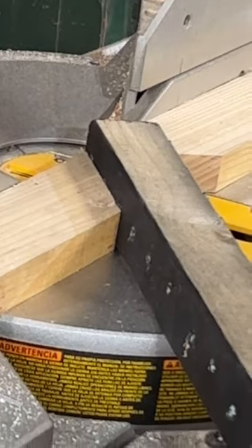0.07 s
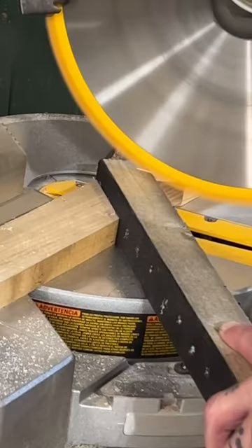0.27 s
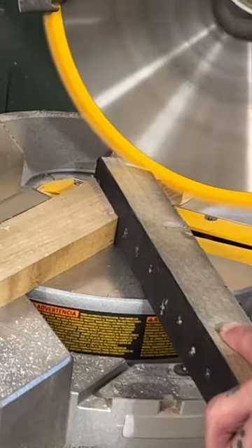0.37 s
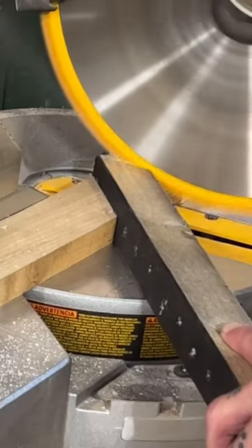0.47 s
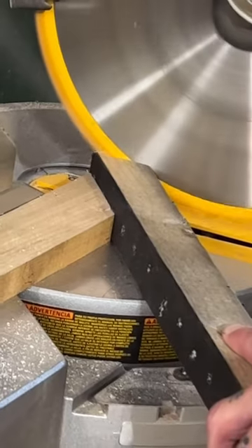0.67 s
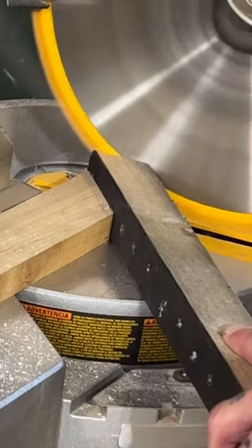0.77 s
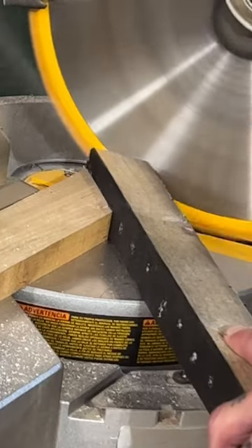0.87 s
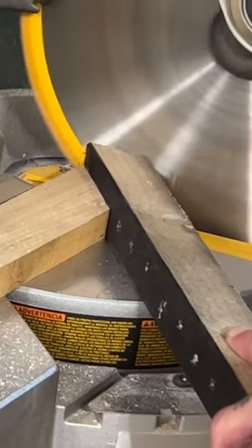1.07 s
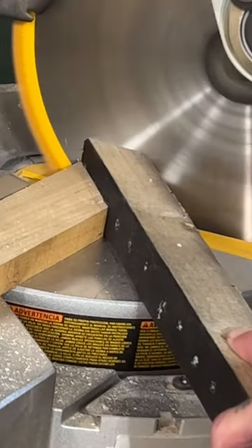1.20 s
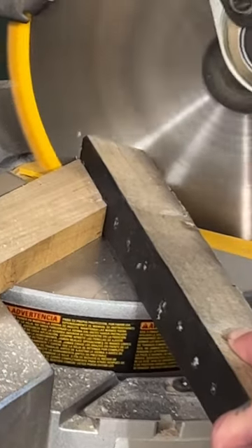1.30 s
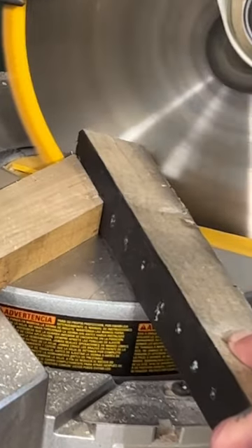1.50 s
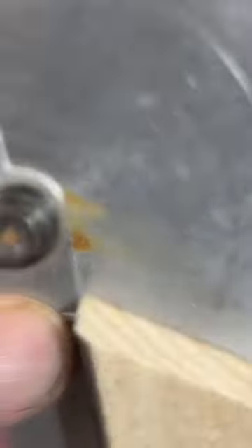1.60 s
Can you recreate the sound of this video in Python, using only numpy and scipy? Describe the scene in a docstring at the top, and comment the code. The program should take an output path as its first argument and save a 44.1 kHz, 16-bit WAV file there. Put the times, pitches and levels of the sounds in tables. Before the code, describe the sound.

Close up, a power miter saw makes one quick, whining cut through a piece of wood.

```python
"""Mitre saw, close up

One cut through wood, picked up from close by on a phone's two microphone ports. A wooden knock dies away,
then the running saw fades in. Its teeth rasp the wood, whine and ring the steel blade over motor and air.
The speed sags under load and recovers, the blade breaks free at 1.2 s, and the saw fades out."""
import sys
import numpy as np
from scipy import signal
from scipy.fft import rfft, irfft
from scipy.io import wavfile
from scipy.ndimage import uniform_filter1d

SR = 44100
rng = np.random.default_rng(int(sys.argv[2]) if len(sys.argv) > 2 else 0)


def master(y):
    """Save y as 16-bit WAV."""
    cut = np.clip(np.atleast_2d(y).T, -1, 1)
    pcm = np.round(cut * 32767)  # scale
    wavfile.write(sys.argv[1], SR, pcm.astype(np.int16))


N = 72765

# Blade speed, sagging deep in the cut. Each row: time in seconds, teeth passing per second.
TOOTH_RATE = [(.15, 2700), (.22, 2753), (.3, 2827), (.38, 2858), (.46, 2879), (.55, 2865), (.65, 2832),
              (.75, 2800), (.85, 2764), (.95, 2705), (1.02, 2682), (1.09, 2692), (1.17, 2765), (1.3, 2840),
              (1.42, 2872), (1.58, 2895)]
# How hard the teeth bite. Each row: time in seconds, gain in dB of the wood's body, the treble, the top.
BITE = [(0.16, -36, -18, -72), (0.2, 6, -10, -15), (0.25, 9.1, -10, 3), (0.3, 11.5, -2.9, -4),
        (0.36, 10.5, -3.4, 3), (0.44, 7, 0.3, -4), (0.53, 5, 1, 1), (0.6, 4, 1.9, 0.5),
        (0.66, 3.5, -1.1, 1.3), (0.74, 3.7, 2.2, -7.5), (0.81, 3, 0.3, -4.5), (0.88, 4.5, -2.7, -4),
        (0.97, -20, -2, -3), (1.06, -5, -4.5, -1), (1.15, -1, -4.5, -5), (1.198, -3, -15.5, -22),
        (1.25, -18.5, -29.5, -33)]
# Colour of tearing wood. Each row: frequency in Hz, relative level in dB.
RASP_SPECTRUM = [(25, -37), (50, -10.5), (85, -9.5), (140, -22.5), (260, -5.5), (380, -10.5), (500, -4.5),
                 (700, -8), (1000, -3.5), (1400, -7.5), (2000, -3), (2700, -1), (3500, 2.5), (4600, -2.5),
                 (5800, 3), (7200, 2), (8600, 4), (9700, -1.5), (11500, 5), (14000, -0.5), (15500, -4)]
# Tooth whine. Each row: time in seconds, level in dB at 1, 2, 3 and 5 times the tooth rate.
WHINE_LEVELS = [(.16, -35, -55, -59.5, -51), (.24, -25.5, -31, -65, -55), (.32, -30, -23, -52, -33),
                (.4, -21.5, -27.5, -47.5, -43), (.5, -32, -31, -50, -38.5), (.56, -21.5, -42.5, -42, -43.5),
                (0.611, -21, -43.5, -16, -39), (.66, -29.5, -28, -44, -38), (.75, -24.5, -26, -42.5, -38),
                (.84, -34, -58, -33, -28), (.895, -27.5, -61.5, -23, -21.5),
                (.96, -34.5, -26.5, -32.5, -40), (1.062, -26.5, -22.5, -42, -43),
                (1.095, -35, -33.5, -48, -50), (1.139, -22.5, -34, -49, -46), (1.21, -42.5, -65, -51, -60)]
# The steel disc. Each row: frequency in Hz, width in Hz, relative dB entering the wood, then deep in it.
BLADE_MODES = [(4955, 22, -52, -39), (5335, 25, -50, -39), (5690, 90, -35, -43), (6398, 22, -33, -43),
               (7112, 16, -27, -32), (7350, 16, -35, -38), (7540, 25, -39, -44), (8200, 16, -39, -36),
               (8542, 16, -35, -43), (9130, 60, -35, -37), (10050, 80, -38, -39), (11305, 25, -38, -39),
               (11940, 18, -36, -36), (12172, 18, -41, -42), (12403, 12, -35, -37), (12490, 12, -37, -38),
               (13038, 14, -46, -39), (13308, 14, -43, -41), (13701, 12, -39, -34), (14196, 18, -41, -43),
               (14293, 14, -38, -39), (14562, 16, -43, -47), (15025, 12, -46, -42)]
# Rings of the clamped wood and the fence. Each row: frequency in Hz, level in dB.
FENCE_TONES = [(801, -34.5), (2061, -53.5), (2682, -38.5)]
# Motor, gears and blade. Each row: multiple of the tooth rate, dB entering, deep in the wood, running free.
MOTOR_LINES = [(.094, -45, -57.5, -47.5), (.1878, -31, -38.5, -36.5), (.243, -35, -44.5, -49),
               (.5, -45, -36.5, -48.5), (.645, -33, -37.5, -46.5), (.717, -42.5, -43, -47.5),
               (.731, -33.5, -52, -42.5), (.938, -39.5, -64, -47), (1.305, -48, -45.5, -40),
               (1.897, -67, -28, -38), (2.608, -42.5, -42, -41.5)]
# Air roar of blade and fan. Each row: frequency in Hz, relative level in dB.
AIR_SPECTRUM = [(25, -16), (50, -15.5), (90, -18), (140, -15), (200, -17), (280, -10), (380, -8.5),
                (520, -3), (700, -6.5), (1000, -7), (1500, -7.5), (2000, -10), (2800, -5.5), (3800, -7),
                (4700, -9.5), (6000, -15), (8000, -12.5), (10000, -20), (12000, -17.5), (15500, -24.5)]
# Knocks ahead of the cut. Each row: start in seconds, level in dB, crack in dB relative to that level.
KNOCKS = [(0., -41.5, -1.5), (.051, -53, 5.5)]
# The knocked wood. Each row: frequency in Hz, relative level in dB, seconds to fall by 60 dB.
WOOD_MODES = [(152, -1.5, 0.23), (243, -4, 0.12), (514, -20, 0.1), (670, -9, 0.12), (950, -6, 0.14),
              (1706, -13, 0.17), (1900, -21, .1)]
# The crack of a knock. Each row: frequency in Hz, relative level in dB.
CRACK_SPECTRUM = [(60, 2), (150, -5.5), (400, -8.5), (900, -6.5), (1600, -17), (2800, -20.5), (5000, -29.5),
                  (9000, -37), (15000, -35)]
# Workshop room tone. Each row: frequency in Hz, relative level in dB.
ROOM_SPECTRUM = [(30, -10), (150, 2), (400, -10), (3000, -33), (15000, -45)]
# The microphone ports. Each row: frequency in Hz, lead of the left in radians, coherence from 0 to 1,
# left minus right in dB.
MIC_PORTS = [(30, 0, 0.99, 0), (100, 0.14, 0.89, -0.8), (550, 0.63, 0.78, -0.3), (1200, 0.41, 0.49, 1.4),
             (2000, 0.36, 0.66, 1.9), (2850, 0.73, 0.82, 0.3), (3700, 1.76, 0.2, 2.5),
             (4500, 0.32, 0.32, 2.7), (5300, 2.29, 0.29, 4.9), (5800, 4.87, 0.14, 4.1),
             (6500, 6.35, 0.59, 3.0), (7200, 6.33, 0.76, 2.0), (8000, 5.65, 0.69, 1.1),
             (8600, 4.99, 0.75, 2.4), (9000, 3.4, 0.9, 0), (9300, 3.14, 1, 0), (10700, 3.14, 1, 0),
             (11000, 2.85, 0.85, 0.4), (11600, 1.92, 0.59, 0.0), (12600, 0.34, 1, -0.3),
             (13700, -0.0, 1, -0.0), (14500, -0.27, 0.82, -0.1), (15100, -1.32, 0.38, -0.7),
             (15600, -2.85, 0.78, -0.2)]

TEETH = 32
ENTERING_S, DEEP_S, BREAK_FREE_S, RUNNING_FREE_S = 0.4, 1.02, 1.22, 1.29


def tearing(teeth, uneven_db=2, scatter_db=1, grain_db=0.5):
    """Each tooth tears a burst of fibres; uneven teeth repeat every turn, and the wood's grain varies."""
    tooth = teeth.astype(int)
    size_db = uneven_db * rng.standard_normal(TEETH)[tooth % TEETH]
    size_db += scatter_db * rng.standard_normal(N)[tooth]
    pulses = 1 + 0.65 * np.cos(2 * np.pi * teeth)
    return unit(rng.standard_normal((2, N)) * pulses * undb(size_db + grain_db * walk(60)))


def rasp(force, level_db=-18.5, body_hz=3200, top_hz=10000):
    """The broad rasp of torn wood, in three bands that each follow the bite."""
    sound = unit(colour(force, undb(across(RASP_SPECTRUM)[0] + ripple())))
    body = 1 / (1 + (bins() / body_hz) ** 4)
    below_top = 1 / (1 + (bins() / top_hz) ** 12)
    bands = body, below_top - body, 1 - below_top
    return undb(level_db) * sum(colour(sound, band) * undb(db) for band, db in zip(bands, curves(BITE)))


def ripple(depth_db=3.5, spacing_hz=50, full_from_hz=6000):
    """Countless weak modes of blade and housing: random peaks and dips in dB, deepest in the treble."""
    span = int(spacing_hz * N / SR)
    bumps = unit(uniform_filter1d(uniform_filter1d(rng.standard_normal(len(bins())), span), span))
    return depth_db * bumps * np.sqrt(np.minimum(bins() / full_from_hz, 1))


def blade(force):
    """The teeth ring the steel disc; its modes change in strength as it sinks into the wood."""
    rings = sum(resonate(force, hz, width_hz) * undb(np.interp(seconds(), [ENTERING_S, DEEP_S], stage_db))
                for hz, width_hz, *stage_db in BLADE_MODES)
    treble_bite_db = curves(BITE)[1]
    return rings * undb(treble_bite_db + 2)


def whine(teeth):
    """Tones at multiples of the tooth rate flutter with the grain and swell once per turn of the blade."""
    tones = sum(tone(multiple * teeth, db, flutter_db=1.5, flutter_hz=69.5, jitter_rad=0.31)
                for multiple, db in zip((1, 2, 3, 5), curves(WHINE_LEVELS)))
    return tones * (1 + 0.13 * np.sin(2 * np.pi * teeth / TEETH))


def fence():
    """The clamped wood and the fence sing at steady pitches in the first half of the cut."""
    t = seconds()
    rings = sum(tone(hz * t, db, flutter_db=2.5, flutter_hz=23, jitter_rad=0.9) for hz, db in FENCE_TONES)
    return rings * np.interp(t, [0.29, 0.35, 0.74, 0.79], [0, 1, 1, 0])


def motor(teeth, loaded_s=0.23, unloaded_db=-6):
    """Rough lines of motor, gears and blade follow the speed and step up as the blade takes the load."""
    t = seconds()
    lines = np.zeros(N)
    for multiple, *stage_db in MOTOR_LINES:
        db = np.interp(t, [ENTERING_S, DEEP_S, RUNNING_FREE_S], stage_db)
        lines += tone(multiple * teeth, db, flutter_db=3, flutter_hz=37.4, jitter_rad=0.19)
    return lines * undb(np.where(t > loaded_s, 0, unloaded_db))


def air(level_db=-26.5, swirl_db=1):
    """Air churned by the blade and the cooling fan."""
    return undb(level_db + swirl_db * walk(30)) * noise(AIR_SPECTRUM)


def knocks(crack_t60_s=0.25):
    """Wood knocks on the saw table: its modes ring dead centre, with a noisy crack spread around them."""
    out = np.zeros((2, N))
    for start, db, crack_db in KNOCKS:
        age = np.maximum(seconds() - start, 0)
        ring = sum(undb(mode_db - 60 * age / t60) * np.sin(2 * np.pi * hz * age)
                   for hz, mode_db, t60 in WOOD_MODES)
        crack = undb(crack_db - 60 * age / crack_t60_s) * ports(noise(CRACK_SPECTRUM))
        out += undb(db) * (ring + crack) * (seconds() >= start)
    return out


def room_tone(level_db=-70):
    """The quiet workshop behind the saw."""
    return undb(level_db) * ports(noise(ROOM_SPECTRUM))


def ports(x):
    """Stereo at the microphone: two signals arrive as direct and scattered sound; one alone is direct."""
    lead, coherence, balance_db = across(MIC_PORTS)
    side = np.array([[1], [-1]])
    spectrum = rfft(x)
    if x.ndim == 2:
        direct, scattered = spectrum
        spectrum = direct * np.sqrt((1 + coherence) / 2) + side * scattered * np.sqrt((1 - coherence) / 2)
    return irfft(spectrum * undb(side * balance_db / 2) * np.exp(1j * side * lead / 2), N)


def resonate(force, hz, width_hz):
    """One mode driven by a force, at rms 1."""
    return unit(colour(force, 1 / (1 + 1j * (bins() ** 2 - hz ** 2) / (bins() * width_hz))))


def tone(cycles, db, flutter_db, flutter_hz, jitter_rad):
    """A sine whose level and phase flutter."""
    amplitude = np.sqrt(2) * undb(db + flutter_db * walk(flutter_hz))
    return amplitude * np.sin(2 * np.pi * cycles + jitter_rad * walk(flutter_hz))


def noise(spectrum):
    """Two unrelated noises of one colour, at rms 1."""
    return unit(colour(rng.standard_normal((2, N)), undb(across(spectrum)[0])))


def walk(rate_hz):
    """Smooth random wander, at rms 1."""
    return unit(colour(rng.standard_normal(N), np.exp(-(bins() / rate_hz) ** 2)))


def colour(x, gain):
    """Filter by a gain per frequency."""
    return irfft(rfft(x) * gain, N)


def curves(table):
    """Each column of a table joined by lines in time."""
    times, *columns = np.array(table, float).T
    return [np.interp(seconds(), times, column) for column in columns]


def across(table):
    """Each column of a table joined by lines in log frequency."""
    hz, *columns = np.array(table, float).T
    return [np.interp(np.log(bins()), np.log(hz), column) for column in columns]


def seconds():
    """Time of each sample."""
    return np.arange(N) / SR


def bins():
    """Frequencies of the spectrum in Hz."""
    return np.maximum(np.fft.rfftfreq(N, 1 / SR), 1)


def undb(db):
    """Decibels to gain."""
    return 10 ** (np.asarray(db) / 20)


def unit(x):
    """Scale to rms 1."""
    return x / np.sqrt(np.mean(x ** 2))


def scene(release_db_per_s=191):
    """One speed drives cut and motor; the workshop is heard only before and after the saw."""
    t = seconds()
    teeth = np.cumsum(curves(TOOTH_RATE)[0]) / SR  # teeth passed so far
    cut = ports(rasp(tearing(teeth))) + ports(blade(tearing(teeth)[0]) + fence() + whine(teeth))
    in_wood = undb(-release_db_per_s * np.maximum(t - BREAK_FREE_S, 0))
    saw = cut * in_wood + ports(motor(teeth)) + ports(air())
    saw_fade = np.interp(t, [0.14, 0.27, 1.425, 1.59], [0, 1, 1, 0]) ** 1.086
    workshop_fade = np.interp(t, [0.113, 0.13, 1.622, 1.639], [1, 0, 0, 1])
    return saw * saw_fade + (room_tone() + knocks()) * workshop_fade


def record(dry, low_hz=38.4, ceiling=0.85, top_hz=15800):
    """The phone cuts the deepest bass, rounds the highest peaks and cuts the top."""
    thin = signal.sosfilt(signal.butter(2, low_hz, "highpass", fs=SR, output="sos"), dry)
    rounded = thin / (1 + (thin / ceiling) ** 6) ** (1 / 6)
    return signal.sosfilt(signal.ellip(10, 0.2, 80, top_hz, fs=SR, output="sos"), rounded)


dry = scene()
out = record(dry)
master(out)
```